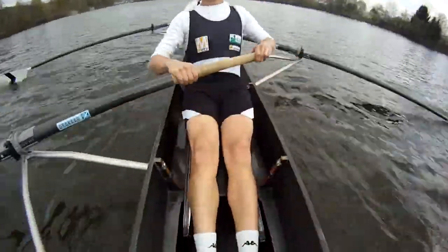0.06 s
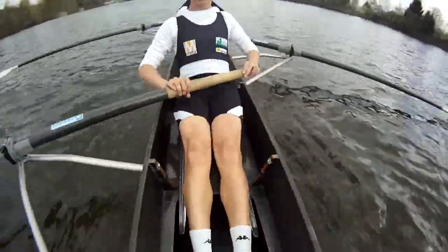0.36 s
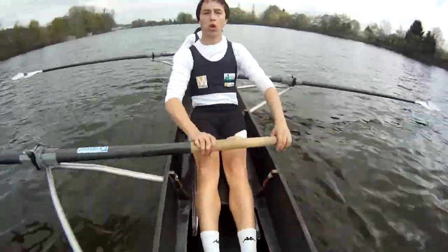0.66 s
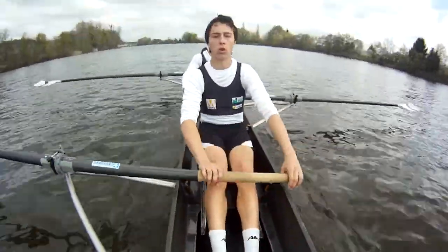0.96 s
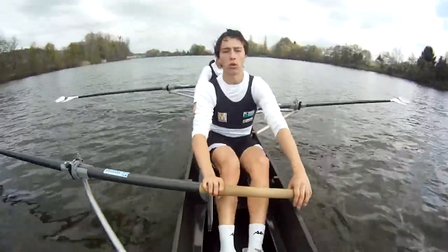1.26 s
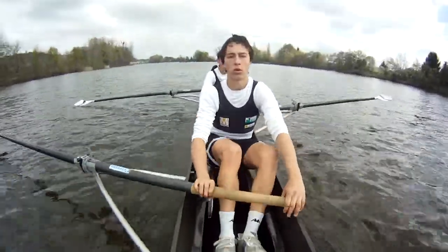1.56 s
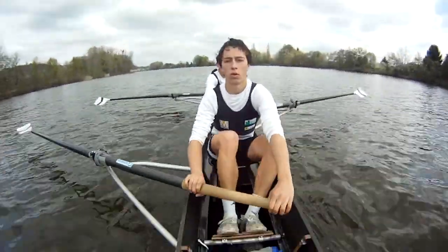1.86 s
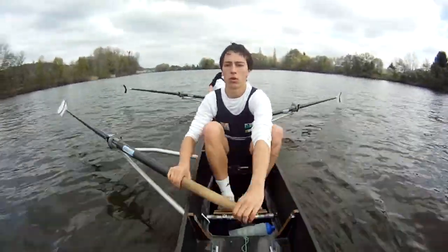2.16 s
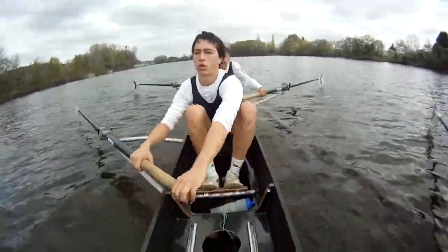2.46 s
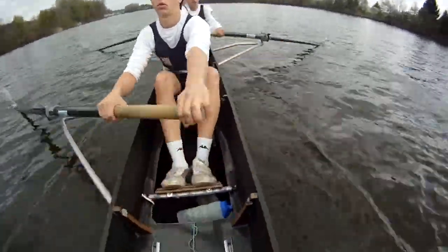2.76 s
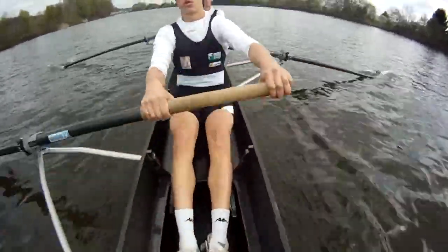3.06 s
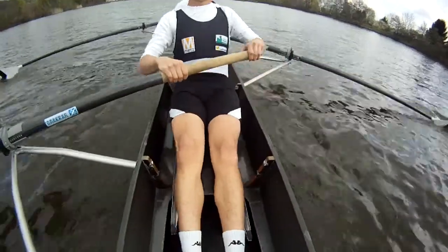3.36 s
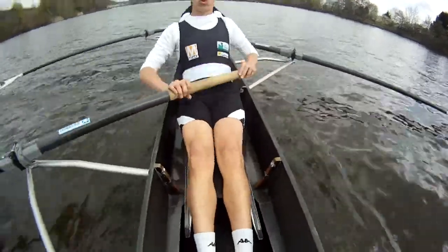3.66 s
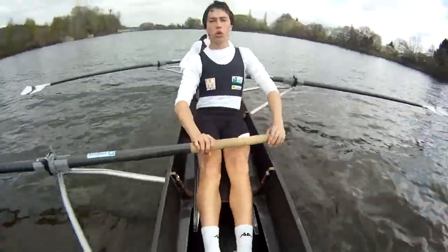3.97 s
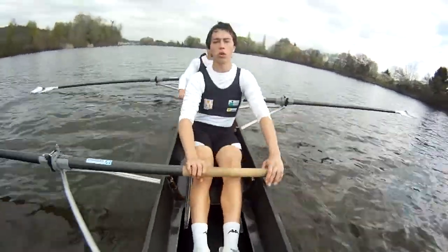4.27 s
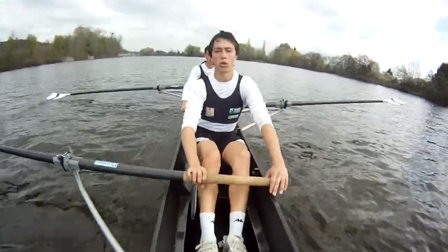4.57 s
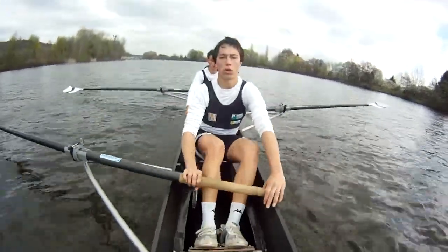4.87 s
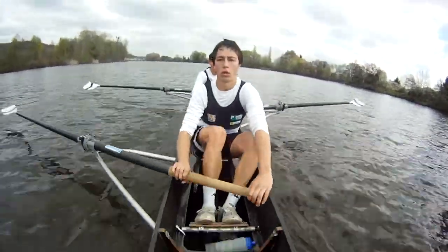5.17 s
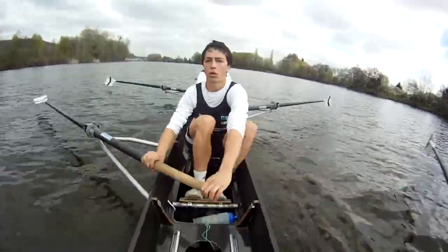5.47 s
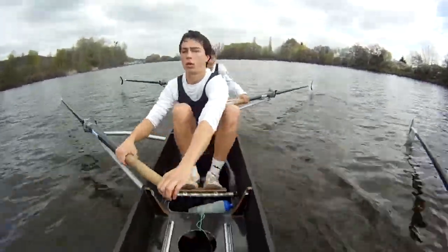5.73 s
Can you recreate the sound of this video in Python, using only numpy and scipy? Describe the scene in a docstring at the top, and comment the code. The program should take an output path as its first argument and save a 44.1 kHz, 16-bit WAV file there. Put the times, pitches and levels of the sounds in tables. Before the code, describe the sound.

A racing rowing boat moves along a river, heard close up from the stern. A stroke ends with a surge of spray and a sharp, loud oar knock. Water washes and drips softly along the hull during the glide, then the blades splash in and the boat rumbles and rattles faintly. A second surge comes with two knocks and a short gurgle, and after another glide the blades dip in again.

```python
"""A surge of water and the knock of oars in their locks, close by: a sweep-oared racing boat ends a stroke.
On a river, from the microphone of a small camera in a waterproof case on the stern. Water washes and
drips along the hull and the seats roll on their rails; the blades splash in at the catch and the drive
rumbles through the shell. At each of two finishes spray flies, the oars knock and the hull shudders."""
import sys
import numpy as np
from scipy import signal
from scipy.fft import rfft, irfft
from scipy.io import wavfile
from scipy.ndimage import uniform_filter1d

SR = 44100
rng = np.random.default_rng(int(sys.argv[2]) if len(sys.argv) > 2 else 0)


def generate_wav(signal):
    """Clip the signal to [-1, 1] and save it as 16-bit WAV at the path in sys.argv[1]."""
    frames = np.transpose(np.atleast_2d(signal))
    scaled = np.clip(frames, -1, 1) * 32767
    pcm = np.round(scaled).astype(np.int16)
    wavfile.write(sys.argv[1], SR, pcm)


N = 264600
TIME = np.arange(N) / SR
CAMERA_RATE_HZ = 12000
GLIDE_DB, WAKE_DB = -59, -50   # wash of the freely running hull; added wash at each finish
LOAD_HOLD_S = 0.22   # the push of the legs


def from_db(db):
    return 10 ** (np.asarray(db) / 20)

def rms_one(x):
    return x / np.sqrt(np.mean(x ** 2) + 1e-20)

def coloured(x, spectrum):
    """Shape x by (f/Hz, level/dB) points, up to half the camera's sample rate; rms 1."""
    hz, db = np.transpose(spectrum)
    bins = np.maximum(np.fft.rfftfreq(N, 1 / SR), 1)
    shape = from_db(np.interp(np.log(bins), np.log(hz), db)) * (bins < CAMERA_RATE_HZ / 2)
    return rms_one(irfft(rfft(x) * shape, N))

def drift(hz):
    """Random wandering, mostly slower than hz; rms 1."""
    bins = np.fft.rfftfreq(N, 1 / SR)
    return rms_one(irfft(rfft(rng.standard_normal(N)) / (1 + (bins / hz) ** 2), N))

def grains(per_s, spread_db):
    """Random clicks of uneven size and sign."""
    sizes = from_db(spread_db * np.minimum(rng.exponential(1, N), 4))
    return (rng.random(N) < per_s / SR) * sizes * rng.choice([-1, 1], N)

def ring(clicks, hz, t60):
    """Each click sets a decaying sine ringing."""
    r, w = from_db(-60 / (t60 * SR)), 2 * np.pi * hz / SR
    return signal.lfilter([0, np.sin(w)], [1, -2 * r * np.cos(w), r * r], clicks + 1e-18)

def low_pass(x, hz, order):
    return signal.sosfilt(signal.butter(order, hz, fs=SR, output="sos"), x + 1e-18)

def bell(x, hz, width_hz, db):
    """Raise or lower one band."""
    a, w = from_db(db / 2), 2 * np.pi * hz / SR
    k = np.sin(w) * width_hz / hz / 2
    middle = -2 * np.cos(w)
    return signal.lfilter([1 + k * a, middle, 1 - k * a], [1 + k / a, middle, 1 - k / a], x)

def add(track, s, sound):
    """Mix a sound into the track at time s."""
    start = int(np.clip(round(s * SR), 0, N - 1))
    track[start:start + len(sound)] += sound[:N - start]

def swell(s, rise_db_per_s, fall_db_per_s, hold_s=0):
    """Gain that rises to 1 at time s, holds and falls."""
    early, late = np.maximum(s - TIME, 0), np.maximum(TIME - s - hold_s, 0)
    return from_db(-np.minimum(rise_db_per_s * early + fall_db_per_s * late, 200))

def together(gains):
    """Unrelated causes add in power."""
    return np.sqrt(sum(gain ** 2 for gain in gains))

def bubbles(per_s, cycles, spread_db, clump_db, count=24):
    """Small bubbles come in clumps; each rings for some cycles at a pitch of its own."""
    births = grains(per_s * from_db(clump_db * drift(7.3)), spread_db)
    pitches_hz = np.geomspace(1000, 3800, count)
    pitch_index = rng.integers(0, count, N)
    return rms_one(sum(ring(births * (pitch_index == k), hz, cycles / hz)
                       for k, hz in enumerate(pitches_hz)))


# spectrum of the seat wheels, further up the boat: f/Hz, level/dB
SEAT_SPECTRUM = [(60, -2), (150, 5.5), (220, -2.5), (320, 0.5), (480, -4.5), (950, -5), (1400, -7.5),
                 (2200, -20.5), (5600, -46)]

def seats(db=-58.5, lead_s=0.44):
    """Seat wheels hum faintly on their rails, fastest on the recovery, lead_s before each catch."""
    speed = sum(swell(s - lead_s, rise_db_per_s=15.5, fall_db_per_s=16.5) for s, *_ in CATCHES)
    return from_db(db) * speed * coloured(grains(per_s=3200, spread_db=0), SEAT_SPECTRUM)


def flow():
    """Strength of the wash: it builds through the drive and ebbs as the boat glides."""
    wakes = [from_db(WAKE_DB) * swell(s, rise_db_per_s=22, fall_db_per_s=12) for s, *_ in FINISHES]
    return together([from_db(GLIDE_DB)] + wakes)

# spectrum of the water along the hull, close to the microphone: f/Hz, level/dB
WASH_SPECTRUM = [(60, 7), (120, 2.5), (280, -6), (550, -9.5), (1100, -8), (2100, -6), (2900, -12),
                 (4200, -16), (5600, -14.5)]

def wash():
    """Water slides along the hull: a soft hiss with fizz and small trickles, swelling with the ripples."""
    hiss = rng.standard_normal(N) + from_db(-7) * rms_one(grains(per_s=700, spread_db=4.5))
    water = coloured(hiss, WASH_SPECTRUM) * from_db(0.88 * drift(11))
    water += from_db(-8) * bubbles(per_s=220, cycles=46, spread_db=2.5, clump_db=5.5)
    lapping = from_db(0.5 * drift(4))
    return flow() * water * lapping


# spectrum of the shaking that comes up through the camera mount: f/Hz, level/dB
SHUDDER_SPECTRUM = [(8, -3), (18, -4.5), (31, 0), (48, -11), (72, -24.5), (130, -39.5), (300, -71)]
# jolts of the body swing, then of hands away: t/s from the finish, level/dB
JOLTS = [(-.01, -24.5), (.105, -24.5)]

def shudder(rest_db=-49.5, load_db=-39.5):
    """The hull shakes the mount: a little always, more under load, most in two jolts at the finish."""
    rumble = coloured(rng.standard_normal(N), SHUDDER_SPECTRUM)
    steady = rumble / np.sqrt(uniform_filter1d(rumble ** 2, size=SR // 6))
    rest = from_db(rest_db + 2.5 * drift(5))
    loads = [from_db(load_db) * swell(s + delay, rise_db_per_s=39, fall_db_per_s=9.5, hold_s=LOAD_HOLD_S)
             for s, _, delay, _ in CATCHES]
    jolts = [from_db(db) * swell(s + delay, rise_db_per_s=126.5, fall_db_per_s=149)
             for s, *_ in FINISHES for delay, db in JOLTS]
    return together([rest] + loads + jolts) * steady


# blades dropping in: t/s, relative entry level/dB, t/s from entry to full load, relative load level/dB
CATCHES = [(2.528, -48.5, 0.19, -45), (5.784, -47.5, 0.12, -45)]
# spectrum of the rattle under load, heard at the stern: f/Hz, level/dB
DRIVE_SPECTRUM = [(60, -6), (150, -4), (300, -1.5), (600, -4.5), (1250, -0.5), (2100, -2), (3000, -7),
                  (4200, -16.5), (5600, -14.5)]
# hollow resonances of the shell: f/Hz, width/Hz, level/dB
SHELL_RESONANCES = [(1176, 60, 3.5), (1890, 62, 3.5)]

def drive():
    """Under load the rolling seats send a fine rattle through the shell and the blades churn up bubbles."""
    rattle = coloured(grains(per_s=5000, spread_db=2.5), DRIVE_SPECTRUM)
    rattle += from_db(-12.5) * bubbles(per_s=290, cycles=39, spread_db=-3, clump_db=4.5)
    for hz, width_hz, db in SHELL_RESONANCES:
        rattle = bell(rattle, hz, width_hz, db)
    entries = [from_db(db) * swell(s, rise_db_per_s=2500, fall_db_per_s=200, hold_s=0.015)
               for s, db, _, _ in CATCHES]
    loads = [from_db(db) * swell(s + delay, rise_db_per_s=107, fall_db_per_s=114, hold_s=LOAD_HOLD_S)
             for s, _, delay, db in CATCHES]
    return from_db(-3) * together(entries + loads) * rattle * from_db(1.1 * drift(25))


# gurgle after the second finish: starting f/Hz, ending f/Hz, level/dB
GURGLE = (355, 300, -43)

def gurgle(at_s=3.716, length_s=0.06):
    """A rough, hollow gurgle sinks in pitch as the water settles."""
    from_hz, to_hz, db = GURGLE
    out, size = np.zeros(N), int(length_s * SR)
    phase = 2 * np.pi * np.cumsum(np.geomspace(from_hz, to_hz, size)) / SR
    wobble = 0.88 * drift(65)[:size]
    add(out, at_s, from_db(db) * np.sin(phase + wobble) * signal.windows.tukey(size, .5))
    return out * from_db(2 * drift(120))


def drips(per_s=4.4, low_hz=1200, high_hz=3384, spread_db=1.5, bubble_db=-1.5):
    """Stray drips fall at random, louder while the wash is strong; rows as in SPLASHES."""
    when, size, pitch = rng.random((int(per_s * N / SR), 3)).T
    over_glide_db = 20 * np.log10(flow()[(when * N).astype(int)]) - GLIDE_DB
    db = -50.5 + 0.76 * over_glide_db + spread_db * (2 * size - 1)
    hz = low_hz * (high_hz / low_hz) ** pitch
    return [(*row, bubble_db) for row in zip(when * N / SR, db, hz)]

# slaps that stand out around the boat: t/s, relative level/dB, bubble f/Hz, bubble level/dB within the slap
SPLASHES = [(0.008, -41, 2250, 1), (0.063, -39, 3080, -16), (0.0947, -37, 2400, -7),
            (0.139, -38.5, 2010, -0.5), (0.196, -27, 2000, -19), (0.381, -31.5, 3400, -2),
            (0.507, -51, 1176, 5.5), (0.815, -42.5, 1840, -3), (0.859, -44, 2060, 2), (0.942, -47, 1240, 0),
            (1.295, -48, 1200, -3), (1.368, -49, 1990, 3), (1.599, -54.5, 1930, 7.5),
            (1.630, -41.5, 1410, -0.5), (2.281, -46, 1880, -1), (2.528, -38, 3340, 0),
            (2.55, -38.5, 1250, -16), (2.708, -38.5, 5350, 0), (3.114, -39.5, 2430, -9),
            (3.263, -39.5, 3400, -3), (3.371, -46, 2670, 0.5), (3.511, -36, 2320, 5.5),
            (3.710, -26, 2290, 4), (4.068, -50.5, 1207, 7.5), (4.203, -35.5, 2300, -14),
            (4.281, -44, 2400, -2), (4.349, -46.5, 2400, 2), (4.954, -43.5, 2000, -1),
            (5.07, -43, 1354, -3.5), (5.763, -36, 3070, -10), (5.788, -27.5, 3460, -1),
            (5.843, -39.5, 2840, 4.5), (5.918, -32.5, 1290, -8), (5.994, -39, 2280, -2)]

def splashes(spatter_t60=0.051, bubble_cycles=89, rise_per_s=0.94, attack_s=0.0015):
    """Each slap or drip spatters briefly and traps a bubble whose pitch creeps up as it dies."""
    out, t = np.zeros(N), TIME[:SR // 10]
    attack = 1 - np.exp(-t / attack_s)
    for s, db, hz, bubble_db in SPLASHES + drips():
        spatter = low_pass(rng.standard_normal(len(t)), 3240, order=2)
        spatter = rms_one(bell(spatter, hz, .5 * hz, db=3))   # coloured by the pocket of air
        spatter *= from_db(-60 * t / spatter_t60)
        fade = from_db(-60 * t * hz / bubble_cycles)
        wobble = 0.094 * np.cumsum(rng.standard_normal(len(t)))   # a bubble is jostled as it rises
        bubble = np.sin(2 * np.pi * hz * t * (1 + rise_per_s * t) + wobble) * fade
        add(out, s, from_db(db) * attack * (from_db(-3) * spatter + from_db(bubble_db) * bubble))
    return out - 0.72 * low_pass(out, 580, order=1)   # thin out the bass


def surge(s, db, landed_s, lead_s=0.15):
    """Water piles up on the blade and falls back; the blade breaks the surface lead_s before the peak."""
    airborne = swell(s - lead_s, rise_db_per_s=190, fall_db_per_s=190, hold_s=lead_s + landed_s)
    return from_db(db) * swell(s, rise_db_per_s=102, fall_db_per_s=82, hold_s=0.03) * airborne

# blades coming out: t/s of the peak, relative level/dB, t/s from the peak until the spray has landed
FINISHES = [(0.261, -34.5, 0.14), (3.574, -33.5, 0.17)]
# spectrum of the spray, heard from the stern: f/Hz, level/dB
SPRAY_SPECTRUM = [(60, 6.5), (150, -0.5), (300, 1), (600, -3.5), (950, -1.5), (1600, 0), (1950, -1.5),
                  (2400, -3.5), (3000, -4.5), (4300, -8.5), (5600, -5.5)]
# narrow resonances of the spray, one list for each finish: f/Hz, width/Hz, level/dB
SPRAY_RESONANCES = [
    [(880, 120, 7.5), (1450, 150, 3.5), (2400, 51, 4.5), (3590, 100, 5), (4150, 190, 9.5), (4990, 70, 6.5)],
    [(840, 100, 6.5), (1200, 70, 3.5), (1470, 120, 6.5), (2400, 53, 5), (3620, 80, 6.5), (5030, 70, 6),
     (5410, 230, 8)],
]

def finish_spray():
    """Water thrown up at the end of the stroke breaks into dense, gurgling spray and bubbles."""
    out = np.zeros(N)
    forces = [surge(*row) for row in FINISHES]
    for force, resonances in zip(forces, SPRAY_RESONANCES):
        spray = coloured(grains(per_s=6000, spread_db=3.5), SPRAY_SPECTRUM)
        for hz, width_hz, db in resonances:
            spray = bell(spray, hz, width_hz, db)
        spray = rms_one(spray)
        dull = low_pass(spray, 2260, order=1)
        brightness = from_db(4) * (force / force.max()) ** 0.9   # a harder throw makes finer spray
        out += force * (dull + brightness * (spray - dull))
    out += from_db(-5.5) * sum(forces) * bubbles(per_s=350, cycles=22, spread_db=0.5, clump_db=1.5)
    return out * from_db(1.3 * drift(35))


# oars striking their locks: t/s, relative level/dB, contact hardness as cutoff f/Hz, relative boom level/dB
OAR_KNOCKS = [(0.198, -19, 3200, -50), (0.3494, 9, 5500, -42), (2.563, -38, 1500, -52.5),
              (3.4941, 2.5, 1470, -60), (3.6664, -3, 2960, -52), (3.72, -23, 2500, -43.5),
              (5.7901, -23, 3800, -43)]
# ringing of oar and lock: f/Hz, level/dB, t60/s
OARLOCK_MODES = [(1300, -44.5, 0.048), (1740, -31, 0.017), (1895, -2.5, 0.0087), (2145, -11.5, 0.011),
                 (2700, -15.5, 0.012), (3340, -12, 0.0081), (4200, -36, .005), (5200, -24.5, 0.0084)]
# boom of the hull under the microphone: f/Hz, level/dB, t60/s
HULL_MODES = [(146.3, -0.5, 0.3), (205, -10, 0.22), (286, 1, 0.24), (417, -11.5, 0.077)]

def oar_knocks():
    """Each blow cracks briefly, duller when the contact is soft, and leaves the hull booming."""
    blows, thumps = np.zeros(N), np.zeros(N)
    click = signal.unit_impulse(SR // 50)
    for s, db, hard_hz, boom_db in OAR_KNOCKS:
        add(blows, s, from_db(db) * low_pass(click, hard_hz, order=3))
        add(thumps, s, from_db(boom_db) * click)
    crack = sum(from_db(db) * ring(blows, hz, t60) for hz, db, t60 in OARLOCK_MODES)
    crack = bell(crack, hz=700, width_hz=800, db=-8.5)   # the stiff fittings give little body
    boom = sum(from_db(db) * ring(thumps, hz, t60) for hz, db, t60 in HULL_MODES)
    return crack + boom


# resonances of the case and mount around the microphone: f/Hz, width/Hz, level/dB
CASE_RESONANCES = [(270, 45, 4), (1200, 18, 6), (1767, 43, -11.5), (1942, 280, 7.5), (2380, 134, 3.5),
                   (3604, 170, 5)]

def through_case(sound):
    """Airborne sound is coloured as it passes the walls of the waterproof case."""
    for hz, width_hz, db in CASE_RESONANCES:
        sound = bell(sound, hz, width_hz, db)
    return sound

def scene():
    """Mono, at the stern: water and seats come through the case, knocks and shudder through the hull."""
    airborne = wash() + seats() + drive() + finish_spray() + gurgle() + splashes()
    return (through_case(airborne) + oar_knocks() + shudder())[None]

def record(dry):
    """The camera samples slowly, overloads on the hardest knock and holds each sample."""
    slow = signal.resample_poly(low_pass(dry[0], 5570, order=12), CAMERA_RATE_HZ, SR)
    held = np.repeat(np.clip(slow, -1, 1), 4)   # holding mirrors the sound into the treble
    out = signal.resample_poly(held, SR, 4 * CAMERA_RATE_HZ)
    treble_cut = signal.ellip(10, .1, 80, 15400, fs=SR, output="sos")
    return np.clip(signal.sosfilt(treble_cut, out), -1, 1)[None]


dry = scene()
out = record(dry)
generate_wav(out)
```